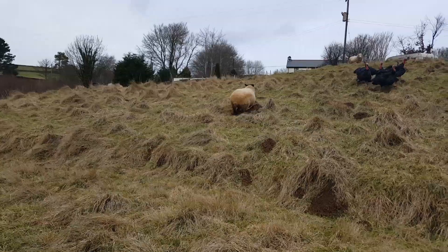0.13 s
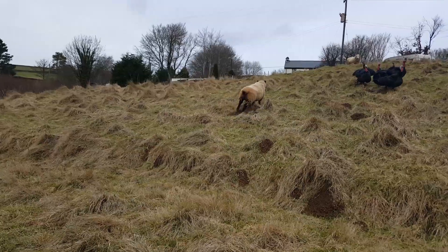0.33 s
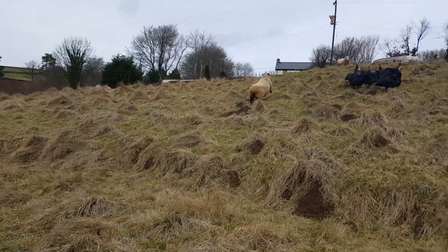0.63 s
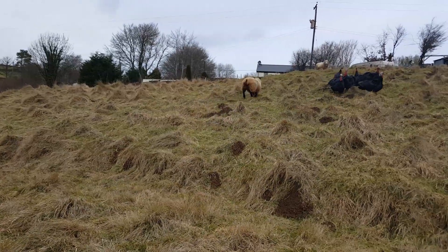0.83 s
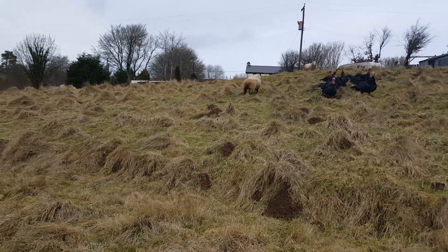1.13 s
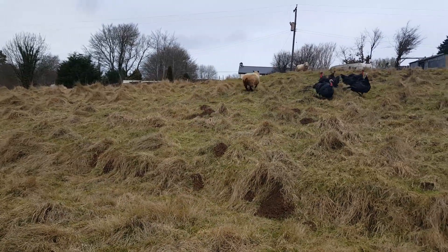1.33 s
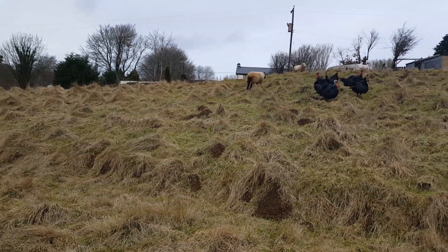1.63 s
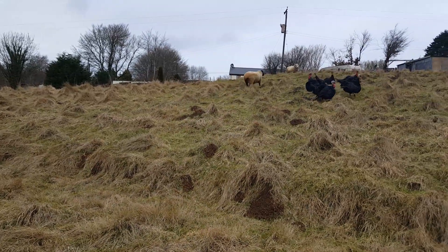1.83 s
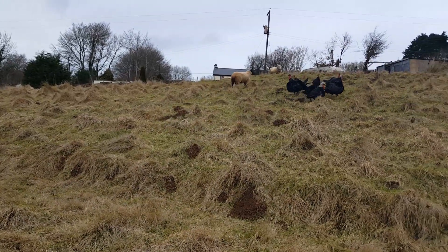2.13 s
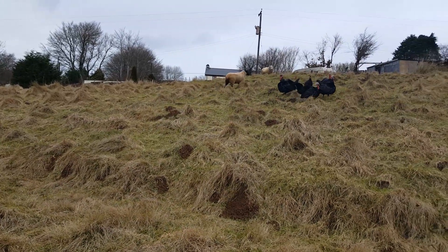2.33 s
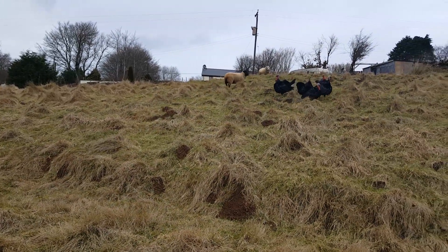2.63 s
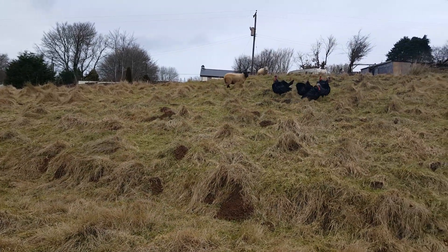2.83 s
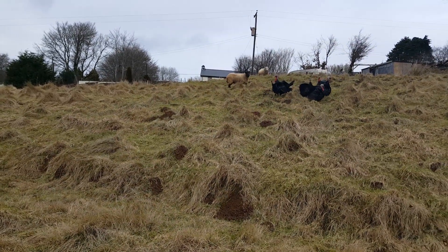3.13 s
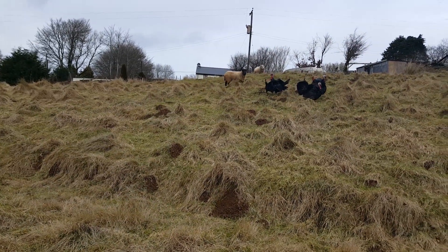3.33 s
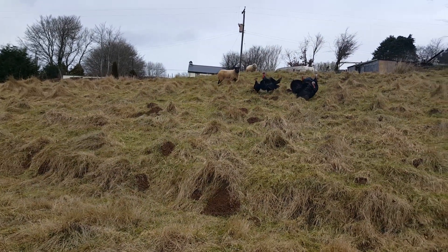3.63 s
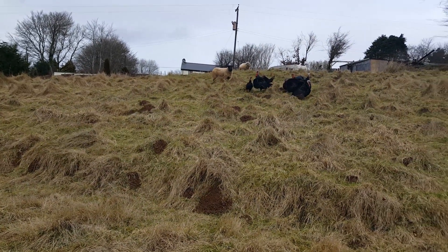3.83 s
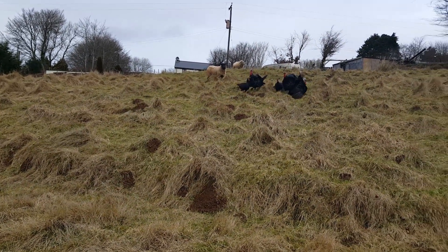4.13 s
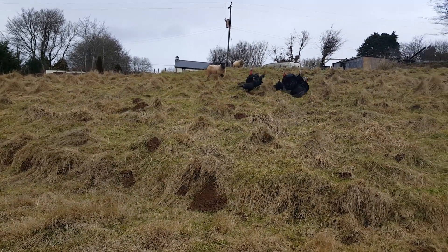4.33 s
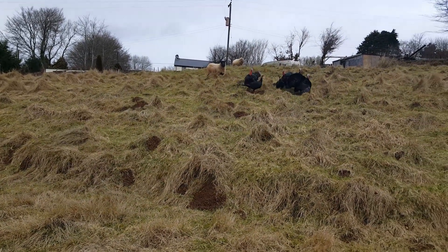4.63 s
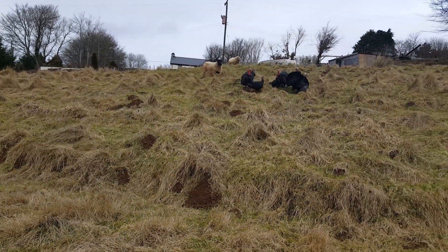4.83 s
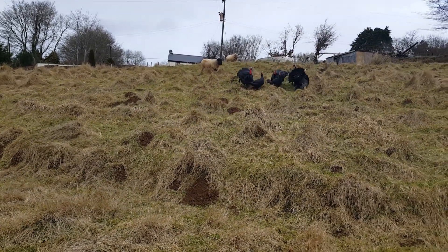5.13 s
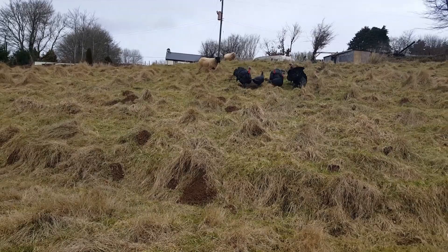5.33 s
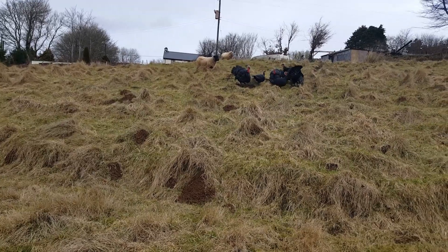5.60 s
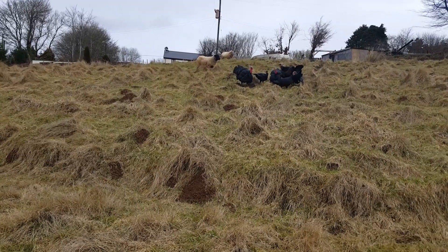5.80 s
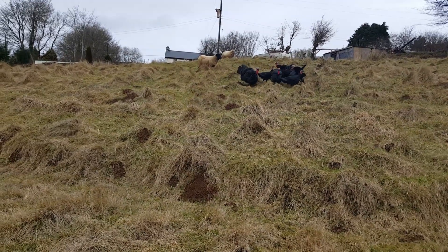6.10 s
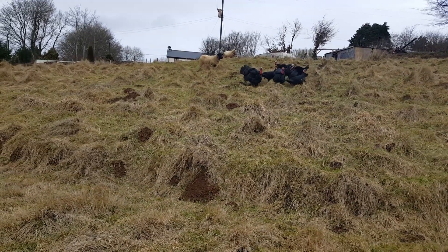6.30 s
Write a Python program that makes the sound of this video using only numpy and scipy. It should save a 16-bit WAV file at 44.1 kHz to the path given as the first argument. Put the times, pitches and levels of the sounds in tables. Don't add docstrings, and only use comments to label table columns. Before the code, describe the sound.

Distant turkeys gobble in quick warbling bursts across an open grassy hillside while someone close by wades through wet ground and dry, rustling grass.

```python
import sys
import numpy as np
from scipy import signal
from scipy.fft import rfft, irfft, next_fast_len
from scipy.io import wavfile
from scipy.ndimage import uniform_filter1d, map_coordinates

SR = 44100
rng = np.random.default_rng(int(sys.argv[2]) if len(sys.argv) > 2 else 0)


def unload_wav(signal):
    wavfile.write(
        sys.argv[1],
        SR,
        np.round(np.clip(np.atleast_2d(signal).T, -1, 1) * 32767).astype(np.int16),
    )


def nominal_scale(level):
    x = np.asarray(level, float) / 20
    return 10 ** x


N = 284886

# start_s, end_s, turn_hz, turn_db, end_db
RISES = [
    (2.711, 2.752, 770, -40.5, -55),
    (2.881, 2.921, 780, -39.5, -49),
    (3.948, 3.986, 719.6, -41.5, -47),
    (4.133, 4.168, 749.5, -43, -50),
    (4.286, 4.322, 740.5, -45, -43),
    (6.099, 6.124, 812, -37, -50.5),
    (6.272, 6.298, 815, -45, -49),
]
LOW_HZ, ONSET, TURN_SHARE = 665.4, 1.01, .52
CLIMB_HZ, PEAK_HZ = 1011, 1100
JUMP = 1.1
# start_s, end_s, knee_hz, knee_db, end_db
FALLS = [
    (1.379, 1.488, 926.3, -50.5, -41),
    (2.503, 2.663, 875, -54.5, -52.5),
    (2.789, 2.846, 941, -48.5, -48),
    (4.023, 4.101, 949, -52.5, -54),
    (5.704, 5.822, 816, -59.5, -56),
    (6.173, 6.232, 926, -51, -63),
]
SAG_START, SAG_MIDDLE = 1.135, 1.07
BREAK_S, BREAK_MIDDLE, BREAK_END = .023, .88, .63
# start_s, end_s, bottom_hz, bottom_db, end_db
DIPS = [
    (1.569, 1.601, 850, -37, -42),
    (1.629, 1.663, 850, -35.5, -41),
    (1.689, 1.719, 845, -38, -42),
    (3.851, 3.877, 721, -43.5, -39),
    (4.502, 4.529, 846, -42.5, -53),
    (4.554, 4.587, 840, -39.5, -37),
]
SLIDE_HZ_PER_S = 12000
REBOUND_S, REBOUND_HZ, REBOUND_BEND = .0125, 1070, 0.2994
# start_s, end_s, first_hz, level_db
BREAKS = [
    (.897, 0.914, 800, -56),
    (1.073, 1.086, 1151, -47),
    (2.98, 3.008, 1080, -50.5),
    (3.874, 3.908, 850, -56.5),
    (6.026, 6.052, 986, -55),
    (6.139, 6.171, 1929, -54.5),
    (6.371, 6.389, 1050, -47.5),
]
# start_s, end_s, middle_hz, level_db
SQUEAKS = [(2.653, 2.671, 1095, -56), (2.749, 2.782, 1400, -53), (2.843, 2.856, 1625, -56),
           (2.843, 2.852, 1100, -55), (3.92, 3.932, 1720, -57), (2.919, 2.96, 1415, -48),
           (3.9, 3.915, 1100, -54), (3.992, 4.006, 1760, -55), (4.006, 4.017, 1400, -54),
           (4.172, 4.205, 1435, -49), (4.324, 4.392, 1409, -53), (5.675, 5.695, 1310, -63.5),
           (5.82, 5.84, 1050, -62), (5.823, 5.84, 1600, -53.5), (5.938, 5.975, 1420, -52.5),
           (6.05, 6.061, 1035, -58), (6.052, 6.062, 1640, -53), (6.125, 6.145, 1535, -50),
           (6.311, 6.326, 1800, -55), (6.328, 6.363, 1396, -49.5)]
SQUEAK_START, SQUEAK_END = 1.05, .96
# start_s, end_s, top_hz, level_db
ARCHES = [
    (1.544, 1.571, 1079, -40.5),
    (3.758, 3.798, 1030, -56.5),
    (6.298, 6.31, 1556, -50),
    (6.387, 6.397, 1700, -48),
]
ARCH_START, ARCH_END = .88, 0.89
# start_s, end_s, first_hz, last_hz, level_db
GLIDES = [(.59, 0.645, 884, 900, -54), (.698, .713, 961, 853, -51), (0.714, .726, 850, 949, -56),
          (.985, 1.03, 1600, 1630, -63), (3.045, 3.068, 1796, 1600, -59), (0.773, 0.783, 700, 1050, -53),
          (.815, 0.84, 660, 754, -53), (0.836, 0.894, 975, 925, -48.5), (0.93, 0.968, 629.6, 699, -58),
          (0.958, 0.973, 1330, 1520, -54), (1.01, 1.034, 992, 940, -38), (1.037, 1.05, 903, 1107, -35.5),
          (1.05, 1.059, 1516, 1635, -42), (1.083, 1.092, 1499, 1505, -57), (1.739, 1.752, 1050, 800, -57),
          (2.43, 2.458, 716, 1128, -58), (2.964, 2.979, 1040, 1079, -47.5), (3.03, 3.06, 630, 558.5, -58),
          (3.035, 3.066, 1250, 1050, -59.5), (3.595, 3.64, 890, 922, -56), (3.64, 3.694, 920, 985, -52.5),
          (3.731, 3.762, 886, 902, -44.5), (3.8, 3.856, 931, 910, -49), (4.212, 4.25, 1027, 780.4, -48.5),
          (4.328, 4.38, 935, 939, -49), (4.379, 4.433, 927, 960, -50.5), (4.478, 4.503, 926, 1042, -42),
          (4.615, 4.621, 898, 730, -53), (1.49, 1.512, 680, 770, -46), (1.512, 1.52, 780, 1150, -48),
          (5.907, 5.93, 609.5, 730, -46.5), (5.932, 5.94, 1070, 1121, -55),
          (5.976, 6.025, 1000, 986, -51.5)]
# time_s, level_db
BRIGHT = [(.6, -16), (.85, -0.5), (1.03, -10), (1.5, -3), (1.7, -2), (2.5, -4.5), (2.9, 0.5), (3.7, -21),
          (3.87, -7), (3.95, 5), (4.2, 1), (4.35, -5), (4.41, 1), (4.6, 2), (5.8, 0.5), (6.1, 4), (6.4, 2)]
# pitch_hz, level_db
OVERTONES = [(1150, 0), (1400, -5.5), (1900, -7.5), (2100, -10.5), (2350, -16), (2750, -4), (3300, -33),
             (6000, -38)]
RASP_DB = 2.2
EFFORT_BRIGHTENS = .6
THRESHOLD_DB = -53.5
BREAK_DULLS_DB = 9

# start_s, end_s, first_hz, last_hz, level_db
SQUELCH = [(.49, .553, 902, 4400, -52.5), (0.478, .55, 3284, 4600, -57), (0.53, 0.546, 264, 218, -53),
           (1.413, 1.435, 204, 244, -40.5), (1.455, 1.482, 400, 560, -45), (1.442, 1.46, 3770, 3200, -53),
           (1.452, 1.53, 2950, 2400, -52.5), (1.474, 1.529, 1009, 1200, -51), (4.357, 4.37, 210, 280, -41),
           (4.357, 4.395, 660, 820, -46), (4.375, 4.404, 450, 284, -54), (4.962, 4.977, 193, 260, -50),
           (6.097, 6.118, 5300, 5720, -58), (3.937, 3.942, 800, 1500, -47),
           (3.611, 3.617, 1000, 1400, -52.5), (3.672, 3.695, 230, 249, -48), (3.718, 3.732, 210, 240, -47),
           (4.128, 4.16, 229, 250, -48), (4.394, 4.412, 800, 850, -46), (1.482, 1.497, 1300, 1347, -48),
           (1.505, 1.52, 1200, 1450, -50), (1.672, 1.688, 1900, 1200, -58), (4.984, 4.998, 220, 200, -49),
           (4.934, 4.946, 11000, 11000, -62), (3.47, 3.485, 894, 690, -54), (1.455, 1.462, 320, 420, -39),
           (1.468, 1.474, 480, 540, -40)]
# time_s, left_minus_right_db
FOOTING = [
    (.55, -18.5),
    (1.41, 1.5),
    (4.4, 2),
    (4.96, -13.5),
    (6.1, -1),
]
# time_s, peak_db, left_minus_right_db, thud_db
SNAPS = [(0.481, -36, -14, -39), (0.644, -50, 18, -50), (1.3224, -52, 6, -50), (2.331, -53, -14, -41),
         (3.398, -30.5, -11, -53), (3.4255, -22, -1, -53), (3.476, -47, -8, -61), (3.6137, -31, 0, -48),
         (3.6989, -38, -3, -41), (3.8624, -35, -4, -45), (3.8916, -31, -3, -47), (3.938, -30, -1, -42),
         (3.948, -40, 5, -45), (4.013, -31.5, -1, -36), (4.142, -36, -10, -50), (4.315, -37, 8, -55),
         (4.7664, -41, -4, -48), (4.954, -41, -2, -55), (6.2089, -48, 0, -34.5)]
# peak_s, rise_s, fall_s, fine_rustle_db, right_port_lift_db
BRUSHES = [(.6, 0.14, 0.53, -70.5, -18), (1.05, 0.16, 0.26, -57.5, -9), (1.34, 0.023, 0.19, -64, -14),
           (1.51, 0.095, 0.04, -53, -3), (2.61, 0.43, .25, -76.5, 9.5), (2.9, .015, .15, -62.5, 12.5),
           (3.078, 0.12, .25, -60.5, 7.5), (3.22, .03, .05, -63.5, 5), (3.37, 0.05, 0.1, -63, 3),
           (3.445, 0.069, 0.11, -61, 8), (3.6, .25, 0.24, -62, 5), (3.761, 0.056, .08, -59, 14),
           (3.861, 0.072, 0.052, -52, 5.5), (3.93, .05, .1, -59.5, 9), (4.16, 0.12, .12, -62, 9),
           (4.4, 0.14, 0.014, -55.5, 7.5), (4.473, 0.025, .2, -60, 14), (4.663, 0.2, 0.018, -57, 7),
           (4.72, 0.11, 0.3, -65.5, 7.5), (4.826, 0.077, 0.055, -61, 6.5), (4.94, 0.07, 0.087, -59.5, 3),
           (5.03, .05, 0.026, -66, 2), (5.89, 0.084, 0.068, -68, 2.5), (6.13, .15, 0.078, -69, 1),
           (6.352, 0.16, .1, -63.5, -8)]
# time_s, fine_rustle_db, right_port_lift_db
STILL = [
    (1.6, -72, -26),
    (2.4, -74.5, 7),
    (5.2, -77.5, 7.5),
]
STRIDE_START_S, STRIDE_END_S = 2.878, 4.69
STRIDE_DB, STRIDE_LIFT_DB = -65, 12
# pitch_hz, level_db_per_hz
FINE = [(590, -34), (1000, 4), (1270, 1), (1380, 4.5), (1660, 3), (4650, -3.5), (6650, -11.5),
        (8970, -14.5), (13100, -5), (15800, -6.5)]
# pitch_hz, left_minus_right_db
FINE_LEAN = [(2000, -0.5), (5000, -0.5), (8000, 16), (9700, 25), (11500, 12.5), (15500, 0.5)]
# pitch_hz, width_hz, level_db
PORT = [
    (4853, 2200, 3),
    (6280, 1860, 4.5),
    (7140, 636, -2),
    (7670, 860, -2.5),
    (12500, 2500, -2.5),
]

# time_s, level_db
AIR = [(.6, -58), (1.0, -53), (1.15, -52.5), (1.5, -52), (1.75, -55), (2.36, -53.5), (2.66, -54),
       (3.2, -53), (3.93, -53), (4.47, -54.5), (4.88, -53.5), (5.6, -54.5), (6.08, -55.5), (6.46, -53)]
# pitch_hz, level_db_per_hz
RUMBLE = [(15, -59), (25, -53), (69, -14.5), (220, -2.5), (275, -8), (401, -17.5), (454, -24), (480, -25.5),
          (700, -23), (910, -31.5), (1540, -120)]
# pitch_hz, likeness (1 = same)
RUMBLE_ALIKE = [(30, .77), (85, .85), (170, .93), (320, .84), (600, .5)]
# pitch_hz, level_db_per_hz
HISS = [(240, -11), (400, -3.5), (561, -4.5), (615, -4.5), (685, -3.5), (1160, -6), (1720, -3),
        (2170, -7.5), (3000, -7), (12500, -29), (15800, -45)]
# pitch_hz, likeness (1 = same, negative = opposed)
HISS_ALIKE = [(500, 0.7), (1400, -0.51), (3100, -0.11), (7000, -0.03)]
# pitch_hz, left_minus_right_db
HISS_LEAN = [(60, 0.0), (110, -1), (200, 7), (380, -1.5), (700, -1.5), (1290, 2.5), (2380, 0), (4400, -1),
             (8120, 9), (15000, 30.5)]
HISS_DB, STIRRED_DB = -61.7, -3

# time_s, level_db
FADE = [(.365, -55), (.385, -16), (.43, -4), (.475, -2.5), (.483, 0.5), (.55, 6)]
# pitch_hz, level_db
RIGHT_MIC = [(6800, 0), (8000, -3), (9300, -5), (10200, -4.5), (11200, -0.5), (12500, -1), (14200, -5),
             (15800, -5)]


def unit(x):
    return x / np.sqrt(np.mean(x ** 2) + 1e-20)


def along(points, hz):
    f, v = np.transpose(points)
    return np.interp(np.log(hz + 1), np.log(f + 1), v)


def curves(rows):
    s, *columns = np.transpose(rows)
    return [np.interp(np.arange(N) / SR, s, column) for column in columns]


def wobble(rate):
    knots = rng.standard_normal(int(N * rate / SR) + 4)
    return map_coordinates(knots, [np.arange(N) * rate / SR])


def filtered(x, response):
    m = next_fast_len(N + SR // 2)
    return irfft(rfft(x, m) * response(np.fft.rfftfreq(m, 1 / SR)), m)[..., :N]


def sides(db):
    return nominal_scale(np.array([db / 2, -db / 2]))


def add(track, part, s):
    i = round(s * SR)
    room = track[..., i:i + part.shape[-1]]
    room += part[..., :room.shape[-1]]


def rush(spectrum, alike, lean, patchy_db):
    z = signal.stft(rng.standard_normal((2, N)), nperseg=512)[2]
    patches = uniform_filter1d(rng.standard_normal(z.shape[1:]), 6, 0)
    patches = unit(uniform_filter1d(patches, 10, 1))
    pair = signal.istft(z * nominal_scale(patchy_db * patches), nperseg=512)[1][:, :N]

    def middle_and_side(hz):
        angle = np.arccos(np.clip(along(alike, hz), -1, 1)) / 2
        return nominal_scale(along(spectrum, hz)) * [np.cos(angle), np.sin(angle)]

    mid, side = filtered(pair, middle_and_side)
    stereo = np.array([mid + side, mid - side])
    return unit(filtered(stereo, lambda hz: sides(along(lean, hz))))


def notes():
    out = [(a, b, first, (first + last) / 2, last, db) for a, b, first, last, db in GLIDES]
    out += [(a, b, hz * SQUEAK_START, hz, hz * SQUEAK_END, db) for a, b, hz, db in SQUEAKS]
    out += [(a, b, hz * ARCH_START, hz, hz * ARCH_END, db) for a, b, hz, db in ARCHES]
    out += [(a, b, hz, hz * BREAK_MIDDLE, hz * BREAK_END, db) for a, b, hz, db in BREAKS]
    for a, b, hz, db, end_db in RISES:
        turn = a + TURN_SHARE * (b - a)
        out.append((a, turn, LOW_HZ * ONSET, LOW_HZ * 1.03, hz, db))
        out.append((turn, b, hz * JUMP, CLIMB_HZ, PEAK_HZ, end_db))
    for a, b, hz, db, end_db in FALLS:
        knee = b - BREAK_S
        out.append((a, knee, hz * SAG_START, hz * SAG_MIDDLE, hz, db))
        out.append((knee, b, hz, hz * BREAK_MIDDLE, hz * BREAK_END, end_db))
    for a, b, hz, db, end_db in DIPS:
        low = b - REBOUND_S
        depth = SLIDE_HZ_PER_S * (low - a)
        halfway = hz + REBOUND_BEND * (REBOUND_HZ - hz)
        out.append((a, low, hz + depth, hz + .38 * depth, hz, db))
        out.append((low, b, hz, halfway, REBOUND_HZ, end_db))
    return sorted(out)


def turkeys(edge_s=.007, jitter=.017, shimmer_db=2.0, swell_db=12, thin_db=16):
    out = np.zeros(N)
    phase, last_s, last_hz, last_db = 0, 0, 0, 0
    drift, flutter, bright_db = wobble(180), wobble(90), curves(BRIGHT)[0]
    for start, end, first, middle, last, db in notes():
        i = np.arange(round((start - edge_s / 2) * SR), round((end + edge_s / 2) * SR))
        t = i / SR
        u = np.clip((t - start) / (end - start), 0, 1)
        hz = first * (1 - u) * (1 - 2 * u) + middle * 2 * u * (2 - 2 * u) + last * u * (2 * u - 1)
        cycles = last_hz * (t[0] - last_s) + np.cumsum(hz * (1 + jitter * drift[i])) / SR
        turn = phase + 2 * np.pi * cycles

        joined = abs(start + edge_s / 2 - last_s) < edge_s and abs(np.log(first / last_hz)) < .11
        if joined:
            effort_db = last_db + (db - last_db) * u ** 1.36
            strain_db = EFFORT_BRIGHTENS * (effort_db.max() - effort_db)
        else:
            swell_s = min(0.97 * (end - start), .026)
            soft_db = np.clip(db - THRESHOLD_DB, swell_db / 5, swell_db) * np.clip(1 - (t - start) / swell_s, 0, 1)
            effort_db = db - soft_db
            strain_db = 0.81 * soft_db
        phase, last_s, last_hz, last_db = turn[-1], t[-1], last, db

        falling = last < .95 * first
        thinning_db = thin_db * np.clip(np.log2(hz / 720) / .25 + falling, 0, 1)
        breaking = last < BREAK_MIDDLE * first / 1.2
        bright_db[i] = bright_db[i] - BREAK_DULLS_DB * u * breaking
        tone = np.sin(turn)
        for k in range(2, 6):
            overtone_db = along(OVERTONES, k * hz) + bright_db[i] + RASP_DB * flutter[i - 900 * k]
            overtone_db -= thinning_db * ((k > 2) + 0.6 * (hz > 1280)) + strain_db
            tone += nominal_scale(overtone_db) * np.sin(k * turn + k)
        nearest_end_s = np.minimum(t - t[0], t[-1] - t)
        fade = np.sin(np.pi / 2 * np.clip(nearest_end_s / edge_s, 0, 1)) ** 2
        out[i] += tone * fade * nominal_scale(effort_db + 1.07 + shimmer_db * flutter[i])
    return out


def hillside(x):
    def arrival(hz):
        lead = np.exp(1j * np.pi * hz * np.array([[-1], [1]]) * 0.000077)
        return lead * sides(0.66)[:, None]

    t = np.arange(SR // 4) / SR
    tail = rng.standard_normal((2, len(t))) * nominal_scale(-60 * t / 0.51)
    tail = tail / np.linalg.norm(tail[0])
    echo = signal.fftconvolve(x[None], tail, axes=1)[:, :N]
    return filtered(x, arrival) + nominal_scale(-16.5) * echo


def boots(spread=.35, steady=0.36):
    out = np.zeros((2, N))
    lumps = nominal_scale(2.2 * wobble(140))
    for start, end, first, last, db in SQUELCH:
        u = np.linspace(0, 1, round((end - start) * SR))
        hz = first + (last - first) * u ** 0.92
        turn = 2 * np.pi * np.cumsum(hz) / SR
        wander = np.cumsum(2 * spread * hz * (first / 600) ** .45) / SR
        bands = [map_coordinates(k, [wander], mode="wrap") for k in rng.standard_normal((2, 900))]
        carrier = steady * (first < 600) * 2
        tone = (carrier + bands[0]) * np.sin(turn) + bands[1] * np.cos(turn)
        tone = unit(tone * lumps[round(start * SR):][:len(u)])
        swell = np.sin(np.pi * u ** 0.5) ** 0.74
        pan_db = np.interp(start, *np.transpose(FOOTING))
        add(out, tone * swell * nominal_scale(db) * sides(pan_db)[:, None], start)
    return out


def cavity(f):
    return sum(nominal_scale(db) * 1j * f * w / (c * c - f * f + 1j * f * w) for c, w, db in PORT)


def snaps():
    out, low = np.zeros((2, N)), np.zeros((2, N))
    t = np.arange(SR // 30) / SR
    for s, db, pan_db, thud_db in SNAPS:
        tick, crack = rng.standard_normal((2, len(t))) * nominal_scale(-60 * t / 0.004)
        crack[:2] = 5, -.5
        thud = np.sin(2 * np.pi * 300 * t) * nominal_scale(thud_db - 60 * t / 0.012)
        pan = sides(pan_db)[:, None]
        add(out, nominal_scale(db - 17) * tick * pan, s)
        add(out, nominal_scale(db - 11.0) * crack * pan, s + 0.001112)
        add(low, thud * sides(.5 * pan_db)[:, None], s + 0.0015)

    def ports(hz):
        return np.array([1 + 0 * hz, 0.15 + 1.54 * cavity(hz)]) / (1 + 1j * hz / 10000)

    return low + filtered(out, ports)


def rustle():
    t = np.arange(N) / SR
    still_db, still_lift_db = curves(STILL)
    striding = (t > STRIDE_START_S) * (t < STRIDE_END_S)
    layers = [(nominal_scale(still_db), still_lift_db), (nominal_scale(STRIDE_DB) * striding, STRIDE_LIFT_DB)]
    for s, rise, fall, db, lift_db in BRUSHES:
        distance = np.where(t < s, (s - t) / rise, (t - s) / fall)
        layers.append((nominal_scale(db - 10 * distance), lift_db))
    gain = np.sqrt(sum(g ** 2 for g, _ in layers))
    ring_gain = np.sqrt(sum((g * nominal_scale(lift_db)) ** 2 for g, lift_db in layers))
    return gain, ring_gain


def grass():
    gain, ring_gain = rustle()
    spikes_db = 5.5 * np.clip(wobble(900) - 1.2, 0, 1.5)
    grit = nominal_scale(1.27 * wobble(25.005) + 0.84 * wobble(70) + spikes_db)
    alike = [(1000, 0.48), (3000, 0.11), (12000, 0.039)]  # Hz, left-right likeness
    fine = unit(grit * rush(FINE, alike, FINE_LEAN, patchy_db=0.5))
    ring = unit(filtered(grit * rng.standard_normal((2, N)), lambda hz: cavity(hz) ** 2))
    ring = ring * nominal_scale(np.array([[-18], [0.1]]))
    return nominal_scale(1.8) * gain * fine + nominal_scale(0.02) * ring_gain * ring


def air():
    rumble_db = curves(AIR)[0]
    hiss_gain = np.hypot(nominal_scale(HISS_DB), nominal_scale(STIRRED_DB) * rustle()[0])
    lumps = nominal_scale(0.86 * wobble(40) + 1.9 * wobble(7))
    rumble = unit(lumps * rush(RUMBLE, RUMBLE_ALIKE, [(100, -0.33)], patchy_db=1.5))
    hiss = rush(HISS, HISS_ALIKE, HISS_LEAN, patchy_db=2.0)
    return nominal_scale(rumble_db - 2.2) * rumble + nominal_scale(2.5) * hiss_gain * hiss


def scene():
    return hillside(turkeys()) + boots() + snaps() + grass() + air()


def low_pass(x):
    return signal.sosfilt(signal.butter(12, 16480, fs=SR, output="sos"), x)


def record(dry):
    started = np.arange(N) > FADE[0][0] * SR
    gain = nominal_scale(curves(FADE)[0]) * started

    def microphones(hz):
        return (hz < 15830) * nominal_scale(np.array([0 * hz, along(RIGHT_MIC, hz)]))

    mix = filtered((dry - 5e-4) * gain, microphones) * started
    return low_pass(mix)


dry = scene()
out = record(dry)
unload_wav(out)
```